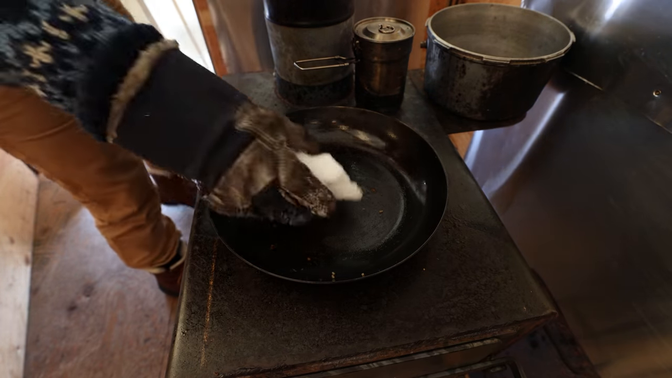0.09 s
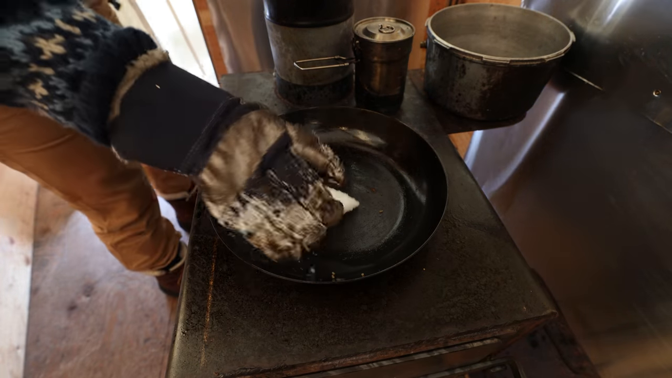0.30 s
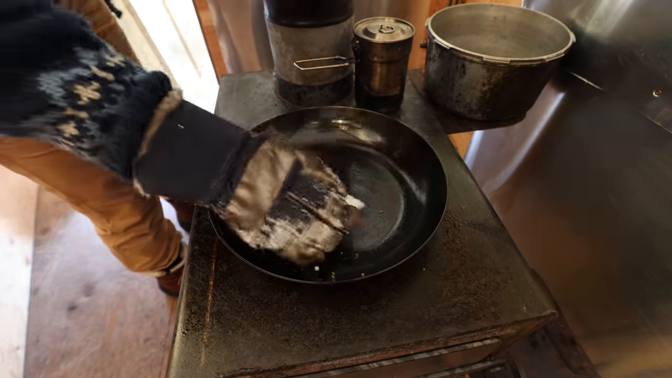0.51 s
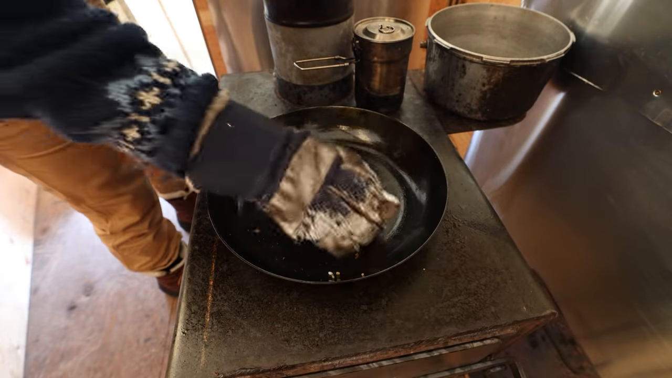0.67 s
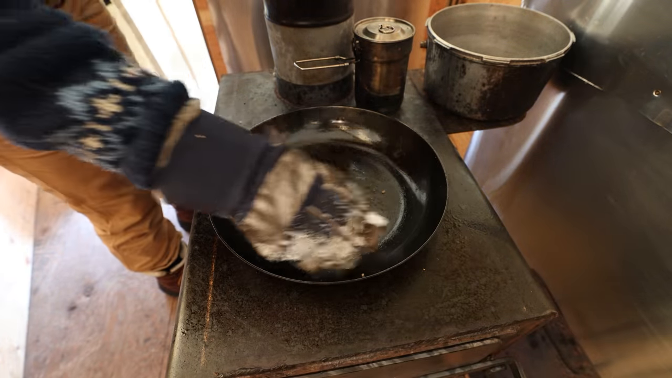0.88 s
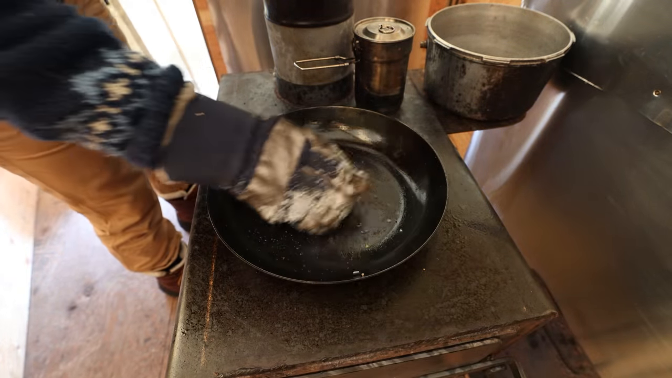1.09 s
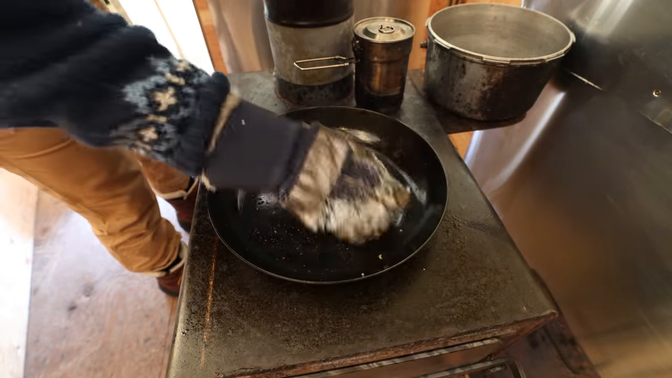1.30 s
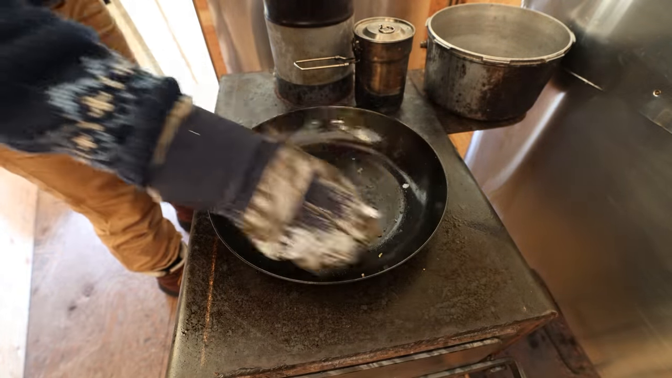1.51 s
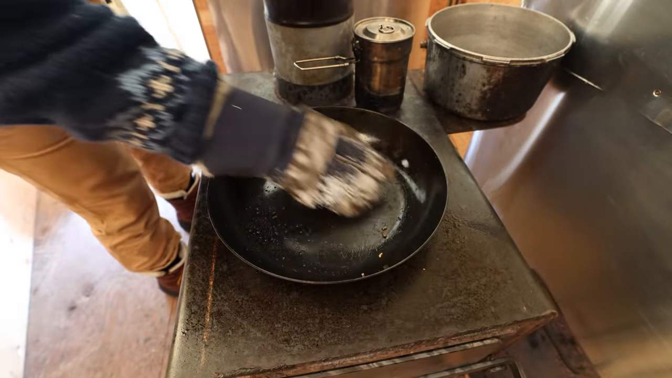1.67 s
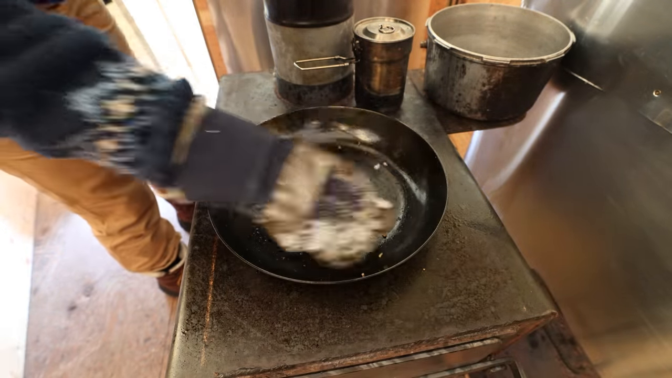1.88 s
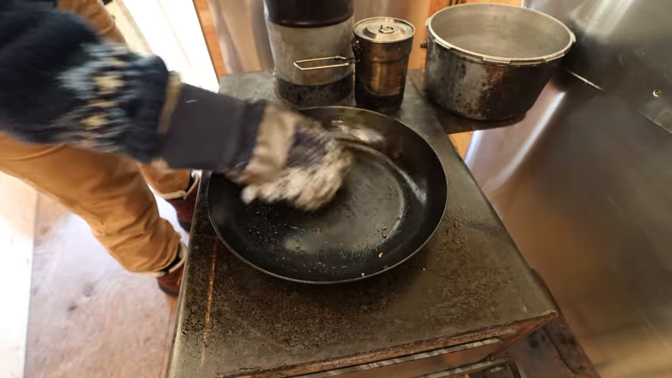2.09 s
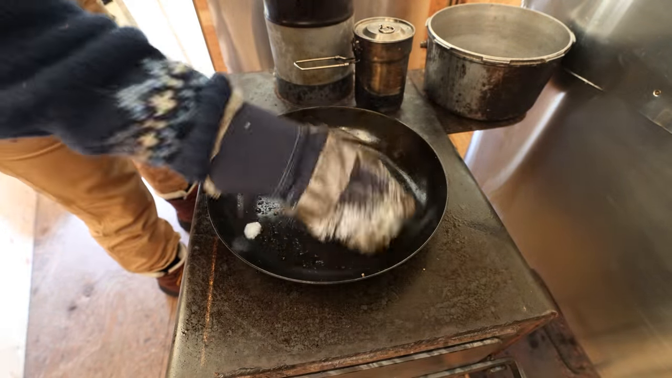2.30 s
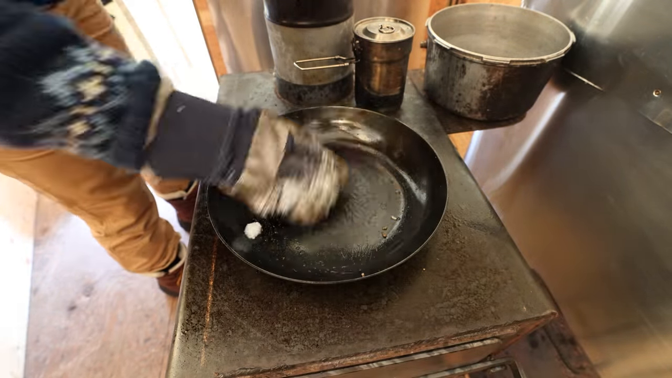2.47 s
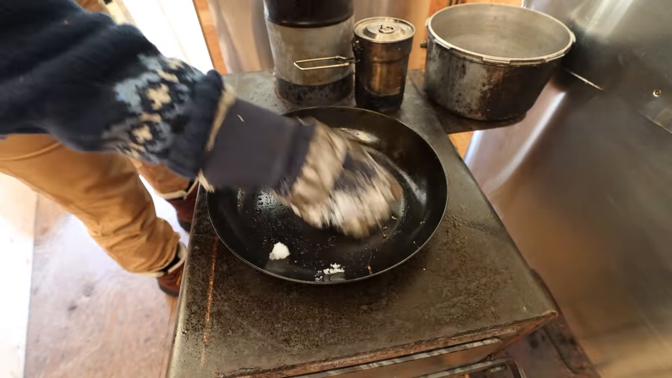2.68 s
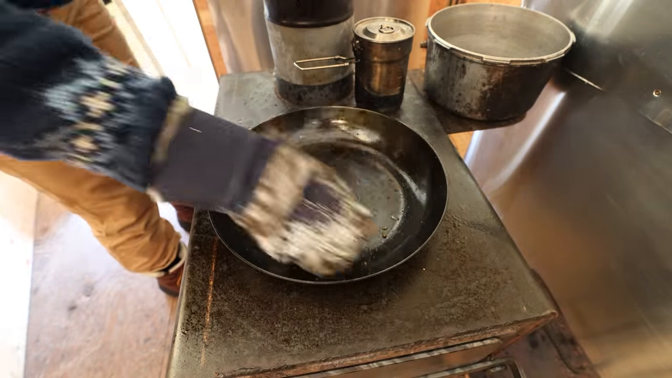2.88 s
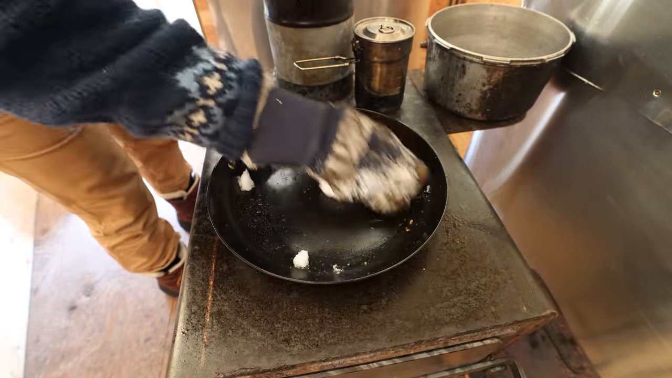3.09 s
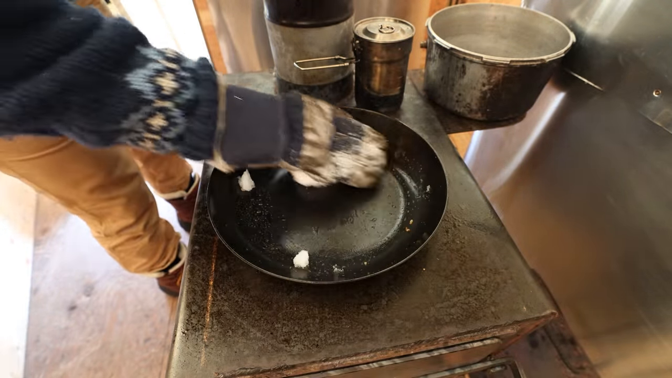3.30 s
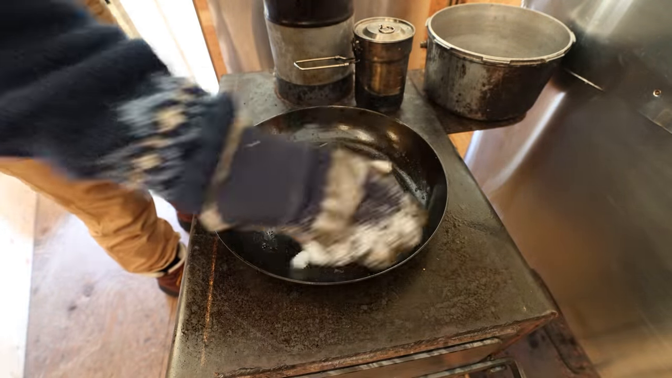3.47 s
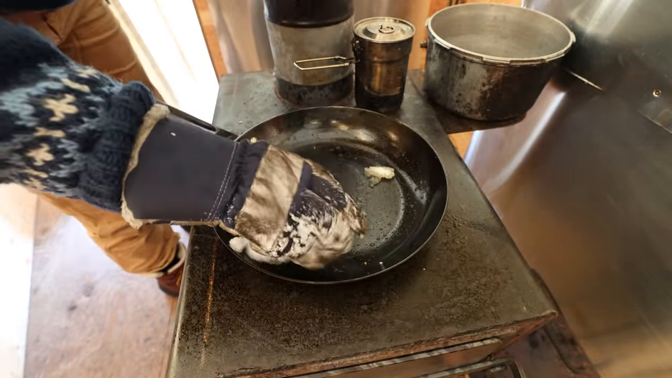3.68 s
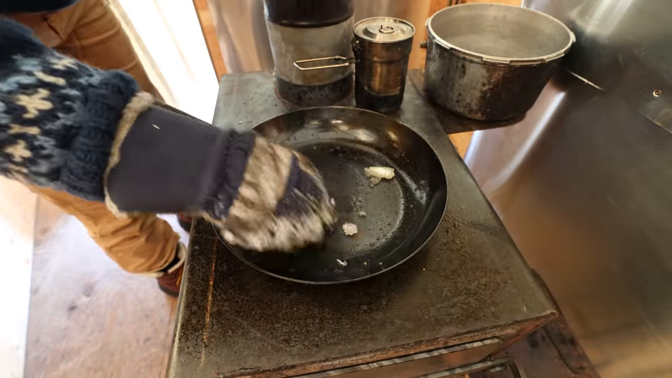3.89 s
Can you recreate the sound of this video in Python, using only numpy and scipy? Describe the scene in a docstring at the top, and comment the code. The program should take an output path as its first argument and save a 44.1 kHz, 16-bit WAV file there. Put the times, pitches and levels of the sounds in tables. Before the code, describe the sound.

A lump of icy snow rasps around a metal pan, bright on pushes and hollow on pulls. Knocks come first, then steady scrubbing with crackles and hiss, weakening late. Close, dry tent sound over faint rumble.

```python
"""A mittened hand scrubs a metal pan with a lump of coarse snow, to and fro, on a hot stove in a tent.
Over a low stove rumble the lump scrapes faintly, the stove top thuds, hard crystals crack and the pan knocks
on the stove, twice hard and then more softly, with a faint last knock near the end. Then meltwater hisses and
ice grains rasp in earnest: random slips excite the pan, bright on pushes, hollow on pulls. Cracks and thuds
recur as filtered noise bursts and decaying modes; the rasp fades as the lump wears away."""
import sys
import numpy as np
from scipy import signal
from scipy.fft import rfft, irfft, next_fast_len
from scipy.io import wavfile
from scipy.ndimage import uniform_filter1d, map_coordinates

SR = 44100
rng = np.random.default_rng(int(sys.argv[2]) if len(sys.argv) > 2 else 0)


def pcm_store(signal):
    """Save signal as 16-bit PCM."""
    levels = np.round(np.clip(np.atleast_2d(signal), -1, 1) * 32767)
    wavfile.write(sys.argv[1], SR, levels.astype(np.int16).T)


N = 171990
T = np.arange(N) / SR  # time in s


def amp(db):
    """Logarithmic level: decibels to amplitude gain."""
    return 10 ** (np.asarray(db) / 20)


def unit(x):
    """Normalisation: scale to rms 1."""
    return x / np.sqrt(np.mean(x ** 2) + 1e-20)


def level_curve(rows):
    """Envelope: gain per sample, interpolated in dB between (start_s, level_db) points."""
    return amp(np.interp(T, *np.transpose(rows)))


def swells(rows):
    """Energy summation: bell-shaped strokes (centre_s, half_length_s, level_db) add in power."""
    power = sum(amp(db) ** 2 * np.exp(-((T - centre) / half) ** 2) for centre, half, db in rows)
    return np.sqrt(power)


def wobble(knots_per_s):
    """Random modulation: a smooth curve through Gaussian knots."""
    return map_coordinates(rng.standard_normal(4096), [T * knots_per_s], mode="wrap")


def spectrum_db(points, hz):
    """Spectral envelope: (frequency_hz, level_db) points joined on a logarithmic frequency axis."""
    f, db = np.transpose(points)
    return np.interp(np.log(hz + 1), np.log(f), db)


def coloured(x, db_of):
    """Minimum-phase filtering: folding the cepstrum makes a causal filter with gain db_of(hz)."""
    m = 2 * next_fast_len(len(x))
    log_gain = np.log(amp(db_of(np.fft.rfftfreq(m, 1 / SR))))
    cepstrum = irfft(log_gain, m)
    cepstrum[1:m // 2] *= 2
    cepstrum[m // 2 + 1:] = 0
    response = np.exp(rfft(cepstrum))
    return irfft(rfft(x, m) * response, m)[:len(x)]


def add(track, start_s, level_db, hit):
    """Superposition: mix a hit into the track; level_db is its rms level over the first 20 ms."""
    hit = hit / np.sqrt(np.mean(hit[:SR // 50] ** 2))
    part = track[round(start_s * SR):][:len(hit)]
    part += amp(level_db) * hit[:len(part)]


# low rumble of the stove, spectral envelope: frequency_hz [Hz], level_db [dB, relative]
RUMBLE_COLOUR = [(20, -8), (55, 2), (95, -12.5), (145, -10), (400, -11.5), (1000, -16), (15000, -57)]


def rumble():
    """Broadband noise: steady random pressure, shaped by a low-heavy spectrum, rms 1."""
    noise = rng.standard_normal(N)
    return unit(coloured(noise, lambda hz: spectrum_db(RUMBLE_COLOUR, hz)))


# resonances of the pan: frequency_hz [Hz], width_hz [Hz], height_db [dB, before scaling by ring]
PAN_RESONANCES = [(837, 62, 7), (1136, 59, 5), (1323, 357, 8), (1529, 46, 8), (2070, 252, 10.5),
                  (2847, 42, 14.5), (3125, 660, 9.5), (3917, 276, 14), (4872, 143, 17), (5590, 153, 15.5),
                  (6224, 430, 11.5), (7363, 270, 9.5), (8330, 337, 10), (9380, 280, 6.5), (10340, 66, 9.5),
                  (11580, 127, 13), (12600, 250, 7), (13900, 310, 6.5)]


def pan_db(hz, ring):
    """Resonance: Lorentzian peaks of the pan in dB; ring scales their height."""
    peaks = sum((amp(abs(db)) ** 2 - 1) / (1 + (2 * (hz - f) / width) ** 2)
                for f, width, db in PAN_RESONANCES)
    return ring * 10 * np.log10(1 + peaks)


GRAINS_PER_S = 9000
JUDDER_DB, JUDDER_KNOTS_PER_S = 1.4, 45
CRUMBLE_DB, CRUMBLE_KNOTS_PER_S = 1, 350


def grains(colour, ring, spread_db=3.5, patchy_db=2.5):
    """Stick-slip friction: random ice-grain slips in juddering clumps excite the pan, rms 1."""
    happens = rng.random(N) < GRAINS_PER_S / SR
    slips = happens * rng.choice([-1, 1], N) * amp(spread_db * rng.standard_normal(N))
    judder = JUDDER_DB * wobble(JUDDER_KNOTS_PER_S)
    crumble = CRUMBLE_DB * wobble(CRUMBLE_KNOTS_PER_S)
    slips = slips * amp(judder + crumble)
    # the colour drifts as the lump changes place: smooth random gains over frequency and time
    z = signal.stft(slips, nperseg=512)[2]
    patches = uniform_filter1d(rng.standard_normal(z.shape), size=4, axis=0)
    patches = uniform_filter1d(patches, size=10, axis=1)
    slips = signal.istft(z * amp(patchy_db * unit(patches)), nperseg=512)[1][:N]
    return unit(coloured(slips, lambda hz: spectrum_db(colour, hz) + pan_db(hz, ring)))


# steady rub between the strokes: start_s [s], level_db [dB]
CONTACT = [(0, -51), (.04, -48), (.12, -69), (.3, -46), (.38, -37.5), (.45, -62), (.5, -35.5), (.57, -46.5),
           (.65, -31), (1.35, -31), (2.03, -33.5), (2.23, -37.5), (2.65, -32.5), (2.87, -36.5),
           (2.95, -32.5), (3.375, -41), (3.66, -38), (3.745, -49.5), (3.9, -48)]
# the lump grinds low when pressed hard: centre_s [s], level_db [dB]
GRINDS = [(.04, -51.5), (0.191, -53.5), (.53, -46), (.815, -48), (1.126, -37.5), (1.435, -38),
          (2.18, -40.5), (3.1, -48), (3.27, -42.5), (3.62, -44.5)]
# pushes of the lump: centre_s [s], half_length_s [s], level_db [dB]
PUSHES = [(.69, 0.021, -32.5), (.83, 0.034, -33), (1.12, 0.057, -26.5), (1.44, 0.061, -27.5),
          (1.768, 0.035, -25), (2.118, 0.046, -27.5), (2.468, 0.046, -30.5), (2.8, 0.017, -30),
          (3.415, 0.0079, -34), (3.51, 0.024, -35.5), (3.615, 0.0074, -34)]
# pulls, hollow under the cupped mitten: centre_s [s], level_db [dB]
PULLS = [(0.934, -27), (1.1, -33.5), (1.286, -25.5), (1.618, -27.5), (1.973, -27.5), (2.115, -32.5),
         (2.31, -27), (2.666, -29), (3.004, -32.5), (3.098, -33.5)]
# spectral envelopes of rub, grind, push (also of cracks) and pull: frequency_hz [Hz], level_db [dB, relative]
RUB_COLOUR = [(60, -50), (230, 0), (310, -11.5), (450, -1), (800, -3.5), (1200, 0), (2000, -2),
              (5000, -10.5), (10000, -15), (15500, -30)]
GRIND_COLOUR = [(90, -33), (220, -14), (600, -4.5), (3000, -42.5)]
PUSH_COLOUR = [(200, -13.5), (1100, -3), (1700, 2), (5700, -10.5), (15500, -14.5)]
PULL_COLOUR = [(200, -48), (650, -19.5), (1130, -4), (1900, -13.5), (15500, -33.5)]
GRIND_HALF_S, PULL_HALF_S = 0.031, 0.03


def scrubbing():
    """Source-filter principle: grain friction, coloured as steady rub, grind, push and pull."""
    grind_gain = swells([(centre, GRIND_HALF_S, db) for centre, db in GRINDS])
    pull_gain = swells([(centre, PULL_HALF_S, db) for centre, db in PULLS])
    rub = level_curve(CONTACT) * grains(RUB_COLOUR, ring=1.04)
    grind = grind_gain * grains(GRIND_COLOUR, ring=0.18)
    push = swells(PUSHES) * grains(PUSH_COLOUR, ring=1.0)
    pull = pull_gain * grains(PULL_COLOUR, ring=1.0)
    return rub + grind + push + pull


WAVER_HZ = 16  # line width of the loose stove top


def phase_waver(length):
    """Phase diffusion: a random walk of phase broadens a spectral line."""
    return np.cumsum(rng.standard_normal(length)) * np.sqrt(2 * np.pi * WAVER_HZ / SR)


# thuds of the stove top under the pan: start_s [s], level_db [dB]
THUDS = [(.033, -43), (.072, -57), (0.227, -38.5), (0.324, -31.5), (2.175, -41.5), (2.818, -43.5),
         (2.849, -41), (2.889, -41.5), (3.251, -41), (3.329, -38.5), (3.855, -40)]
# modes of the stove top: frequency_hz [Hz], level_db [dB, relative], t60_s [s]
STOVE_MODES = [(110.9, -16, 0.94), (143.3, -7, 0.75), (221.3, 6.5, 0.13), (532.3, 3.5, 0.098)]


def stove_thuds():
    """Modal decay: the loose sheet-metal top rings low and unevenly when the pan rocks on it."""
    out, t = np.zeros(N), T[:SR // 2]
    onset = 1 - np.exp(-t / 0.0016)
    for start_s, level_db in THUDS:
        ring = np.zeros(len(t))
        for hz, mode_db, t60 in STOVE_MODES:
            phase = 2 * np.pi * (hz * t + rng.random()) + phase_waver(len(t))
            ring += amp(mode_db - 60 * t / t60) * np.sin(phase)
        add(out, start_s, level_db, ring * onset)
    return out


# cracks of hard crystals: start_s [s], level_db [dB]
CRACKS = [(0.157, -57), (.471, -45.5), (1.449, -30), (1.862, -31.5), (1.889, -31.5), (1.954, -35.5),
          (2.198, -37), (2.307, -35.5), (2.445, -28.5), (3.007, -37), (3.259, -34), (3.853, -37.5)]
SNAP_T60_S = 0.005
CRUMBS_DB, CRUMBS_T60_S = -9, 0.063  # level relative to the snap


def cracks():
    """Brittle fracture: a hard crystal snaps on the pan as a brief noise burst, then scatters crumbs."""
    out, t = np.zeros(N), T[:SR // 8]
    for start_s, level_db in CRACKS:
        snap = amp(-60 * t / SNAP_T60_S)
        crumbs = amp(CRUMBS_DB - 60 * t / CRUMBS_T60_S)
        burst = rng.standard_normal(len(t)) * (snap + crumbs)
        crack = coloured(burst, lambda hz: spectrum_db(PUSH_COLOUR, hz) + pan_db(hz, ring=1.0))
        add(out, start_s, level_db, crack)
    return out


# pan knocks on the stove: start_s [s], level_db [dB], landing [0 on edge to 1 flat], rattle_t60_s [s]
KNOCKS = [(0.2232, -25, 0.06, 0.041), (0.3228, -18.5, 0.88, 0.033), (.498, -34.5, 1, 0.05),
          (0.584, -35.5, 0.2, 0.084), (3.854, -44, 0, 0.047)]
# modes that a knock sets ringing: frequency_hz [Hz], edge_db [dB, relative], flat_db [dB, relative]
KNOCK_MODES = [(1318, 1, -10), (2088, -3, 1.5), (2897, -22, 5), (3960, -11, -5), (4790, -1.5, -8),
               (10445, -22, -15.5), (14100, -12, -23)]
# spectral envelope of the strike and rattle: frequency_hz [Hz], level_db [dB, relative]
KNOCK_COLOUR = [(100, -31), (750, -3.5), (1300, -3.5), (2600, -0.5), (6000, -11), (15500, -19)]
STRIKE_T60_S = 0.009
RATTLE_DB = 8.5  # starting level relative to the strike
RING_DB, RING_T60_S = -1, 0.08  # level relative to strike and rattle together


def knocks():
    """Impact excitation: a hard strike and short rattle; how the pan lands weights the ringing modes."""
    out, t = np.zeros(N), T[:SR // 3]
    onset = 1 - np.exp(-t / 0.00044)
    for start_s, level_db, landing, rattle_t60 in KNOCKS:
        envelope = amp(-60 * t / STRIKE_T60_S) + amp(RATTLE_DB - 60 * t / rattle_t60)
        force = rng.standard_normal(len(t)) * envelope
        strike = coloured(force, lambda hz: spectrum_db(KNOCK_COLOUR, hz) + pan_db(hz, ring=1.0))
        ring = np.zeros(len(t))
        for hz, edge_db, flat_db in KNOCK_MODES:
            mode_db = edge_db + landing * (flat_db - edge_db)
            phase = 2 * np.pi * (hz * t + rng.random())
            ring += amp(mode_db - 60 * t / RING_T60_S) * np.sin(phase)
        add(out, start_s, level_db, (unit(strike) + amp(RING_DB) * unit(ring)) * onset)
    return out


# meltwater hiss: start_s [s], level_db [dB]
SIZZLE = [(.45, -70), (.68, -41.5), (2.05, -45), (2.2, -33.5), (2.24, -44), (2.87, -54), (3.27, -34),
          (3.38, -50.5), (3.63, -44), (3.76, -64)]
# spectral envelope of the hiss: frequency_hz [Hz], level_db [dB, relative]
STEAM_COLOUR = [(500, -47), (3000, -5.5), (15500, -0.5)]


def meltwater():
    """Shot noise: water spits and fizzes on the hot metal, in spikier grains than the rub."""
    return level_curve(SIZZLE) * grains(STEAM_COLOUR, ring=0.63, spread_db=5.0)


def tent_echo(x):
    """Diffuse reverberation: decaying noise as the short, soft echo of heat shield and canvas."""
    t = T[:SR // 3]
    decay = amp(-60 * t / 0.13)  # t60 of 0.13 s
    tail = rng.standard_normal(len(t)) * decay * (1 - np.exp(-t / 0.013))
    return signal.fftconvolve(x, tail / np.linalg.norm(tail))[:N]


RUMBLE_DB, ECHO_DB = -52.5, -12.5


def scene():
    """Linear superposition: all sounds of the pan, their echo in the tent and the stove's rumble."""
    pan = scrubbing() + stove_thuds() + cracks() + knocks() + meltwater()
    return (pan + amp(ECHO_DB) * tent_echo(pan) + amp(RUMBLE_DB) * rumble())[None]


TOP_HZ = 15900  # band limit


def record(dry):
    """Band limitation: no spectral component is kept from the band limit upward."""
    m = next_fast_len(N + SR // 2)
    passed = np.fft.rfftfreq(m, 1 / SR) < TOP_HZ
    return irfft(rfft(dry, m) * passed, m)[:, :N]


dry = scene()
out = record(dry)
pcm_store(out)
```